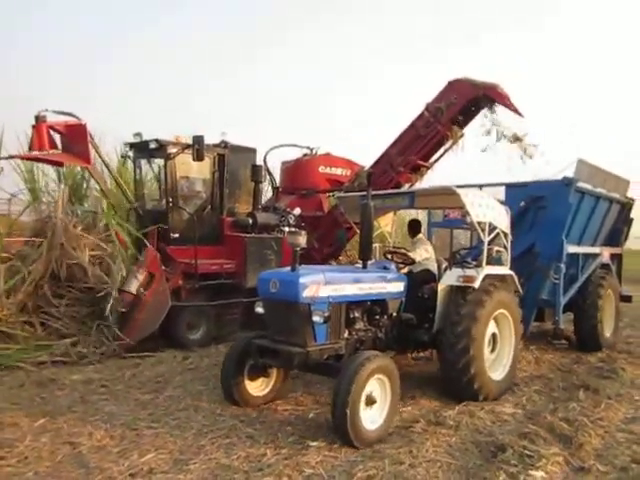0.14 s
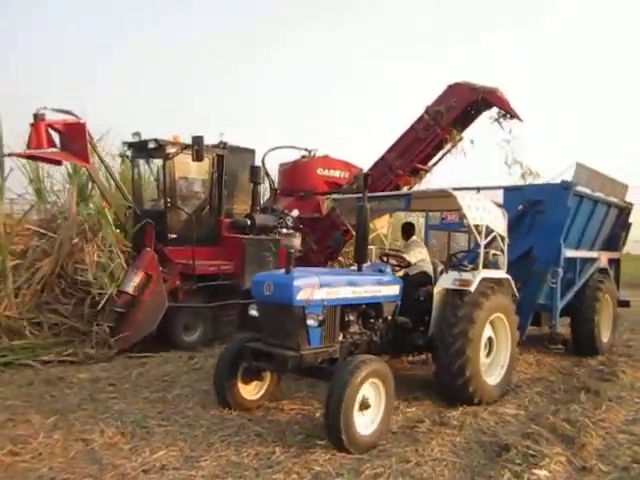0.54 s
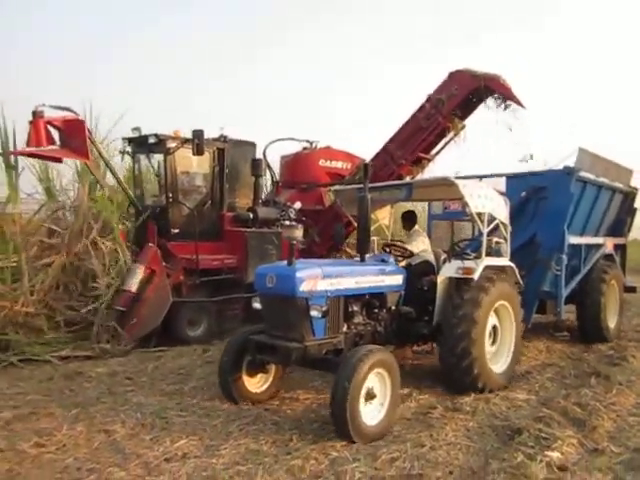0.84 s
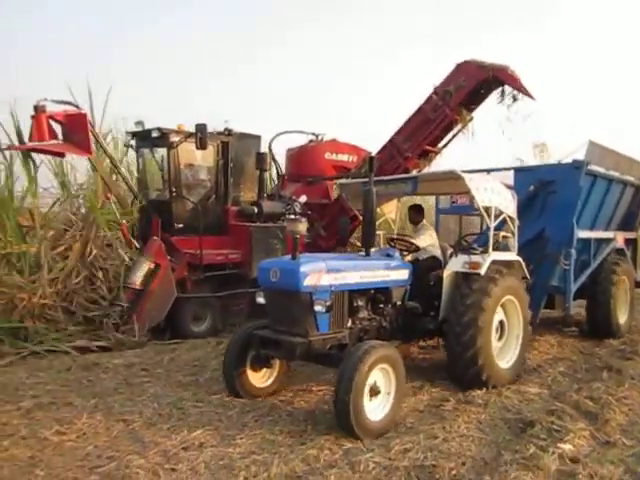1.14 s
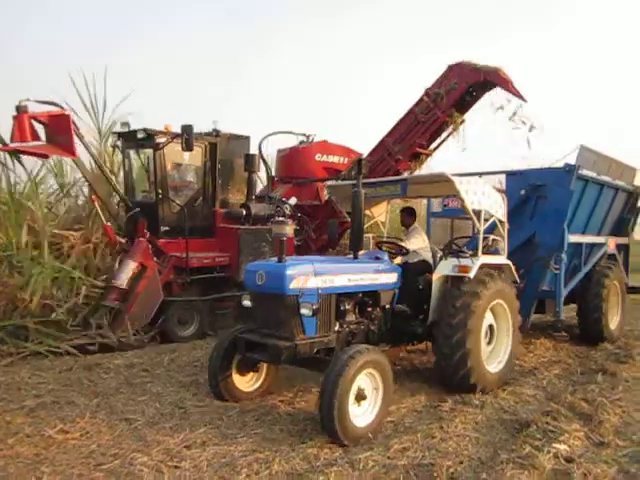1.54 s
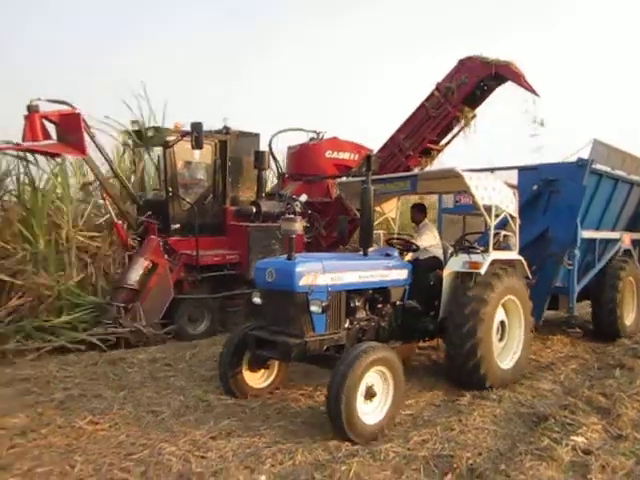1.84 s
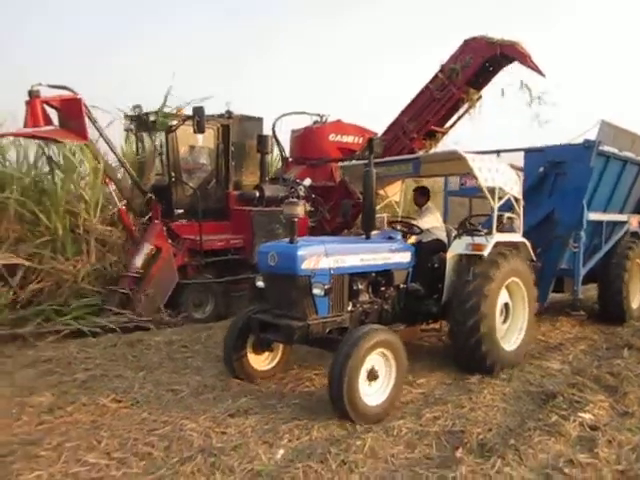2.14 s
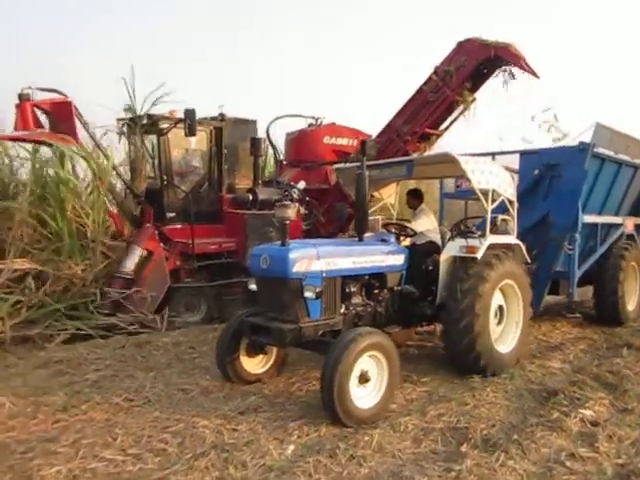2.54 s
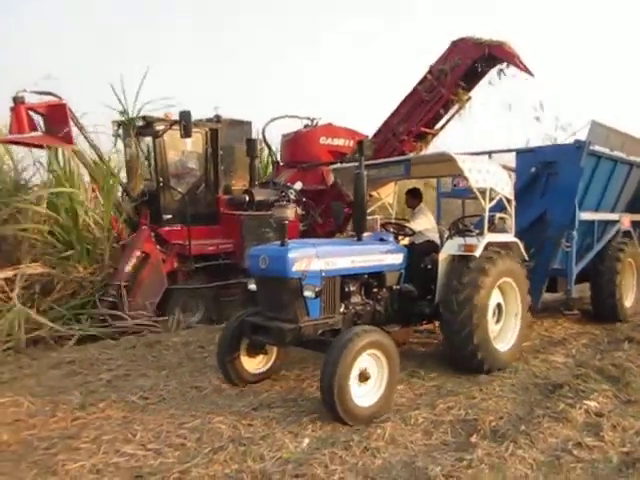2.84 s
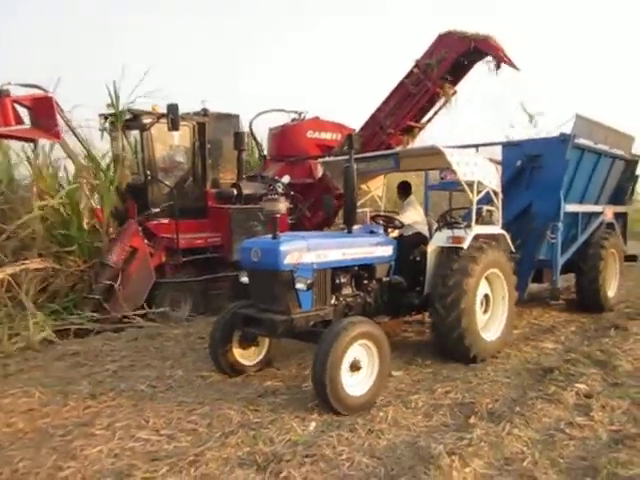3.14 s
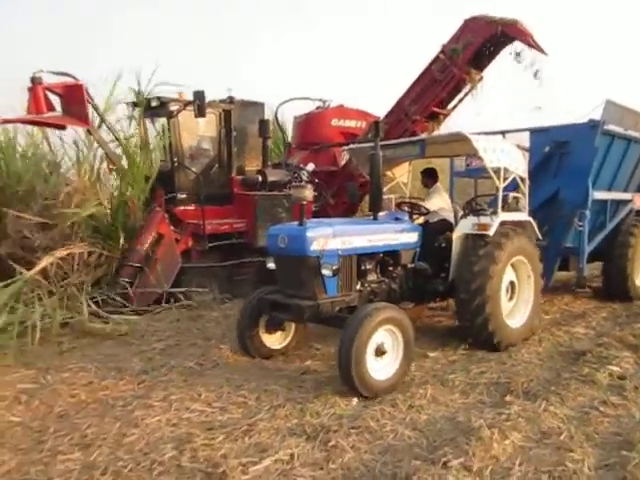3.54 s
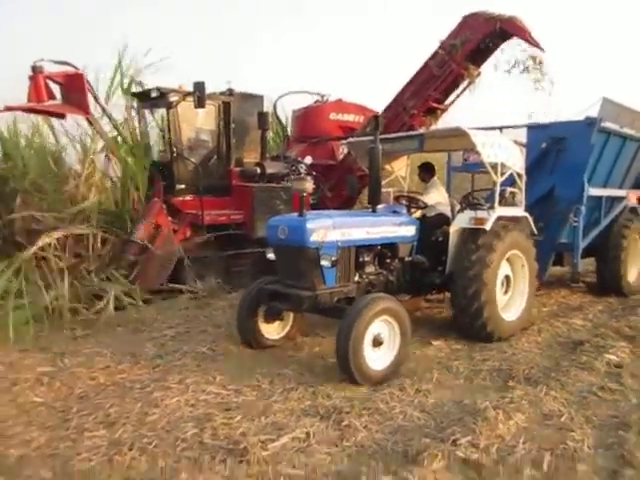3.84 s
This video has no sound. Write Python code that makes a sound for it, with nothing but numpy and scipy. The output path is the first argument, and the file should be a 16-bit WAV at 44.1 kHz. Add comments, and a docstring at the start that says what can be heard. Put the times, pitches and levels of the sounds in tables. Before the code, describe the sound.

A cane harvester roars throughout, broad and midrange-heavy, with a nearly steady hydraulic whine and faint low engine hum from it and the tractor. Metal panels knock and cane rattles densely. Short crunches stand out around 0.7, 0.8 and 1.2 seconds, with softer ones later. The roar flutters near 1.1 and 2.2 seconds; a sharp digital tick lands at 1.4. Open field, small camera metres away, slightly saturated, thin bass, muted treble.

```python
"""A broad machine roar with a steady hydraulic whine: a cane harvester beside a tractor in an open field.
One diesel speed sets the sines of the crank orders and two hydraulic pumps; the tractor adds a fixed low tone.
Fans, exhausts and gears are patchy noise, coloured by hollow bodywork; billets knock the ringing sheet metal.
Cut cane rattles as dense clicks and is chopped in short crunches. A small camera some metres off picks this up,
thin in the bass and without the top treble. One digital tick, a splice, comes after the camera's treble loss."""
import sys
import numpy as np
from scipy import signal
from scipy.fft import rfft, irfft, next_fast_len
from scipy.io import wavfile
from scipy.ndimage import uniform_filter1d, map_coordinates

SR = 44100
rng = np.random.default_rng(int(sys.argv[2]) if len(sys.argv) > 2 else 0)


def unload_audio(sound):
    """Save the sound as a 16-bit wav file, at the path given as the first command line argument."""
    columns = np.transpose(np.atleast_2d(sound))
    # keep every value between -1 and 1, then stretch to whole-number steps
    steps = np.round(np.clip(columns, -1, 1) * 32767)
    wavfile.write(sys.argv[1], SR, steps.astype(np.int16))


def gain_from_db(level_db):
    """Convert decibel levels to linear amplitude factors (20 dB per decade)."""
    decades = np.asarray(level_db, float) / 20
    return 10 ** decades


N = 175959  # length in samples

# Engine speed as heard in the pumps: start_s, main_pump_hz, main_pump_db, second_pump_db
ENGINE_SPEED = [(0, 397, -28.5, -36), (.35, 397.7, -29, -33), (.7, 393.6, -28.5, -34.5),
                (1.05, 396, -30, -33.5), (1.25, 395, -31.5, -35.5), (1.6, 394.5, -29, -33.5),
                (2.0, 395.6, -30, -31.5), (2.2, 399, -29, -39), (2.55, 399.8, -31.5, -39),
                (2.7, 400.3, -30, -36), (2.95, 397.8, -29, -46), (3.2, 398.2, -29.5, -45),
                (3.45, 397.6, -30.5, -38), (3.7, 397.2, -28.5, -44), (3.99, 397, -29, -38)]
# Main pump harmonics: harmonic_number, level_db over the main pump level
MAIN_PUMP_HARMONICS = [(1, -0.1), (2, -7)]
# Second pump overtones: harmonic_number, level_db
SECOND_PUMP_OVERTONES = [(2, -47), (3, -43), (6, -50), (7, -54)]
# Diesel crank orders: order in cycles per turn, level_db
CRANK_ORDERS = [(1, -67), (2, -54), (4, -50), (6, -49), (8, -50)]
# Engine load, the contour behind the roar's level: start_s, level_db
ENGINE_LOAD = [(0.0, -31), (0.01, -27), (0.88, -27), (1.04, -28.5), (1.07, -26), (1.09, -31), (1.12, -26.5),
               (1.14, -31), (1.19, -25), (1.21, -28), (1.82, -27.5), (1.83, -26), (1.89, -29.5),
               (2.02, -27.5), (2.03, -27), (2.16, -29.5), (2.19, -24.5), (2.21, -28), (2.99, -27),
               (3.06, -30), (3.18, -27), (3.99, -28.5)]
# Roar spectrum before the bodywork: frequency_hz, relative_density_db
ROAR_SPECTRUM = [(12, -57.5), (28, -39), (45, -29), (60, -18.5), (123, -13), (285, -11.5), (340, -6),
                 (415, -6.5), (500, -3), (620, -5.5), (740, -9.5), (850, -6), (1200, -10.5), (1500, -14.5),
                 (1700, -15.5), (1920, -17), (2190, -16), (5000, -25), (5780, -27.5), (8000, -30)]
# Resonances of the hollow bodywork: centre_hz, width_hz, lift_db
BODY_HOLLOWS = [(315.7, 41, 5.5), (248.5, 40, 3.5), (580, 65, 0), (932, 80, 3), (1248, 200, 2)]
# Sheet-metal modes: pitch_hz, width_hz, relative_level_db
PANEL_MODES = [(318, 20, 1.3), (488, 21, -4), (572, 10, -3), (656, 23, -5.5), (934, 16, 2), (1205, 32, -5),
               (1700, 80, -11)]
# Colour of rattling and chopped cane: frequency_hz, relative_level_db
CANE_COLOUR = [(700, -35), (1500, -5.5), (2500, -0.5), (4000, -1.7), (5500, -1), (8000, -4.5)]
# Bursts of chopped cane: centre_s, level_db, length_s, centre_hz
CHOP_BURSTS = [(0.383, -34, .03, 3000), (0.662, -27, 0.025, 2900), (.72, -32, .02, 3000),
               (0.809, -29.5, 0.025, 3400), (1.166, -28.5, 0.016, 3800), (1.29, -33, 0.025, 3100),
               (1.832, -35, .04, 5000), (2.07, -39, .03, 3480), (2.658, -35, .07, 3770),
               (2.998, -32, 0.026, 5200), (3.039, -33, 0.034, 5500), (3.26, -39, .07, 2300),
               (3.597, -34, 0.055, 5300)]
# Treble loss of the camera: frequency_hz, gain_db
CAMERA_TREBLE = [(5600, 0), (5800, -1.5), (6150, -8), (6520, -21), (6800, -36), (6900, -60), (7000, -120)]


def unit(x):
    """Scale to rms 1."""
    return x / np.sqrt(np.mean(x ** 2) + 1e-20)


def along(points, hz):
    """Read (Hz, value) points on a log frequency axis."""
    f, value = np.transpose(points)
    return np.interp(np.log(hz + 1), np.log(f + 1), value)


def curves(rows):
    """One value per sample for each column after the time."""
    s, *columns = np.transpose(rows)
    return [np.interp(np.arange(N) / SR, s, column) for column in columns]


def wobble(rate):
    """A smooth random curve, rate knots a second."""
    knots = rng.standard_normal(int(N * rate / SR) + 4)
    return map_coordinates(knots, [np.arange(N) * rate / SR])


def filtered(x, response):
    """Shape the spectrum of x by a response of frequency."""
    size = next_fast_len(N + 8192)
    return irfft(rfft(x, size) * response(np.fft.rfftfreq(size, 1 / SR)), size)[:N]


def tone(turns, db, waver_db, drift):
    """A sine on a running count of turns, with slow unrest in level (dB) and phase (radians)."""
    level = np.sqrt(2) * gain_from_db(db + waver_db * wobble(6.02))  # db is an rms level
    return level * np.sin(2 * np.pi * (turns + rng.random()) + drift * wobble(9))


def drives():
    """Pumps and crank are geared to one engine speed; the tractor's firing tone keeps its own fixed pitch."""
    second_over_main = .9195  # gear ratio of the two pump tones
    pump_per_turn = 12  # second pump tone over crank speed
    tractor_hz, tractor_db = 73.6, -56.5
    hz, main_db, second_db = curves(ENGINE_SPEED)
    main = np.cumsum(hz) / SR
    second = main * second_over_main
    crank = second / pump_per_turn
    out = sum(tone(k * main, main_db + db, waver_db=.8, drift=.15) for k, db in MAIN_PUMP_HARMONICS)
    out += tone(second, second_db, waver_db=1.5, drift=.25)
    out += sum(tone(k * second, db, waver_db=2.5, drift=.4) for k, db in SECOND_PUMP_OVERTONES)
    out += sum(tone(k * crank, db, waver_db=1, drift=0.36) for k, db in CRANK_ORDERS)
    return out + tone(tractor_hz * np.arange(N) / SR, tractor_db, waver_db=0.5, drift=0.55)


def body_lift_db(f):
    """Each hollow part of the bodywork lifts the noise around its resonance."""
    return sum(db / (1 + (2 * (f - centre) / width) ** 2) for centre, width, db in BODY_HOLLOWS)


def roar():
    """Fan, exhaust and gear noise in patches, lifted by hollow bodywork; the bass follows the load less."""
    roar_db = 5.5  # whole roar over the mean load level
    load_db, = curves(ENGINE_LOAD)
    spectra = signal.stft(rng.standard_normal(N + 512), nperseg=512)[2]
    # smoothing over frequency, then time, makes patches of louder and softer noise
    patches = uniform_filter1d(rng.standard_normal(spectra.shape), size=6, axis=0)
    patches = uniform_filter1d(patches, size=10, axis=1)
    air = signal.istft(spectra * gain_from_db(.8 * unit(patches)), nperseg=512)[1][:N]
    air = unit(filtered(air, lambda f: gain_from_db(along(ROAR_SPECTRUM, f) + body_lift_db(f))))
    low = filtered(air, lambda f: 1 / (1 + (f / 450) ** 4))
    high = air - low
    swing_db = load_db - load_db.mean()
    low_gain = gain_from_db(0.24 * swing_db)
    high_gain = gain_from_db(1.2 * swing_db + 0.25 * wobble(12))
    return gain_from_db(load_db.mean() + roar_db) * (low_gain * low + high_gain * high)


def clicks(per_s, t60):
    """Random blows of uneven size, each a short crackle of noise that falls 60 dB in t60 seconds."""
    spread_db, loudest_db = 3, 11
    draw = rng.random((int(per_s * N / SR), 3))  # time, size, sign
    size_db = np.minimum(-spread_db * np.log(1 - draw[:, 1]), loudest_db)
    size = gain_from_db(size_db) * np.sign(draw[:, 2] - .5)
    blows = np.bincount((draw[:, 0] * N).astype(int), size, N)
    t = np.arange(1024) / SR
    crackle = rng.standard_normal(1024) * gain_from_db(-60 * t / t60)
    return signal.fftconvolve(blows, crackle)[:N]


def panel_ring(f):
    """The sheets answer as a sum of damped modes of alternating sign."""
    out = 0
    for k, (centre, width, db) in enumerate(PANEL_MODES):
        mode = 1j * f * width / (centre * centre - f * f + 1j * f * width)
        out = out + (-1) ** k * gain_from_db(db) * mode
    return out


def panels():
    """Billets and chain links strike the elevator and trailer sheets and set them ringing."""
    knocks_per_s, knock_db = 70, -35
    level = gain_from_db(knock_db + 2 * wobble(3))
    return level * unit(filtered(clicks(knocks_per_s, t60=.001), panel_ring))


def cane():
    """Stalks rattle as dense clicks; each chop is a crunch of grains and noise with its own colour."""
    rattle_per_s, rattle_db = 500, -41
    chop_octaves = .55  # spread of a burst about its centre
    colour = lambda f: gain_from_db(along(CANE_COLOUR, f))
    level = gain_from_db(rattle_db + 2 * wobble(8))
    out = level * unit(filtered(clicks(rattle_per_s, t60=0.0087), colour))
    grains = unit(clicks(1500, t60=0.0047))
    crunch = filtered(grains + 1.5 * rng.standard_normal(N), colour)
    t = np.arange(N) / SR
    for s, db, length, hz in CHOP_BURSTS:
        bell = lambda f: np.exp(-.5 * (np.log2(f / hz + 1e-9) / chop_octaves) ** 2)
        swell = np.exp(-np.abs(2 * (t - s) / length) ** 1.9)
        out = out + gain_from_db(db) * swell * unit(filtered(crunch, bell))
    return out


def splice_tick():
    """A digital splice: one downward step that relaxes with a time constant of 0.34 ms."""
    start_s, peak_db = 1.38703, -10
    t = np.arange(N) / SR - start_s
    return -gain_from_db(peak_db) * (t >= 0) * np.exp(-np.abs(t) / 0.00034)


def scene():
    """All the machine and cane sounds reach one microphone."""
    return (drives() + roar() + panels() + cane())[None]


def top_cut(x):
    """Nothing passes above the cut-off."""
    return signal.sosfilt(signal.butter(12, 15800, fs=SR, output="sos"), x)


def record(dry):
    """The input stage rounds off the peaks and the camera drops the top; the splice tick comes after both."""
    ceiling_db, knee = -6.5, 4.4  # where the peaks saturate, and how sharply
    x = dry[0] / (1 + np.abs(dry[0] / gain_from_db(ceiling_db)) ** knee) ** (1 / knee)
    x = filtered(x, lambda f: gain_from_db(along(CAMERA_TREBLE, f))) + splice_tick()
    return top_cut(x[None])


dry = scene()
out = record(dry)
unload_audio(out)
```